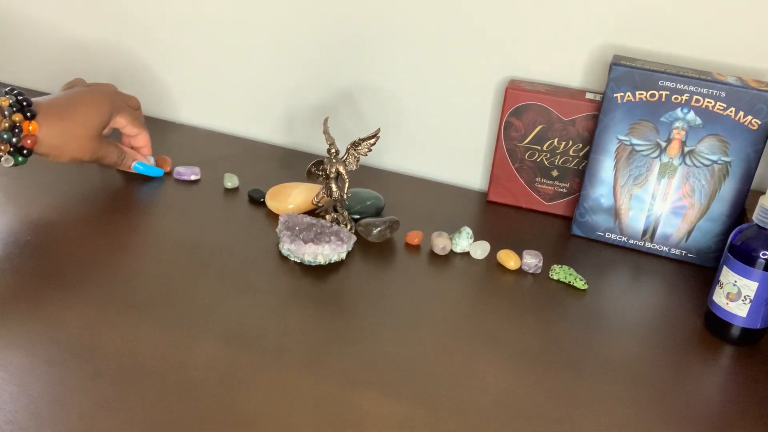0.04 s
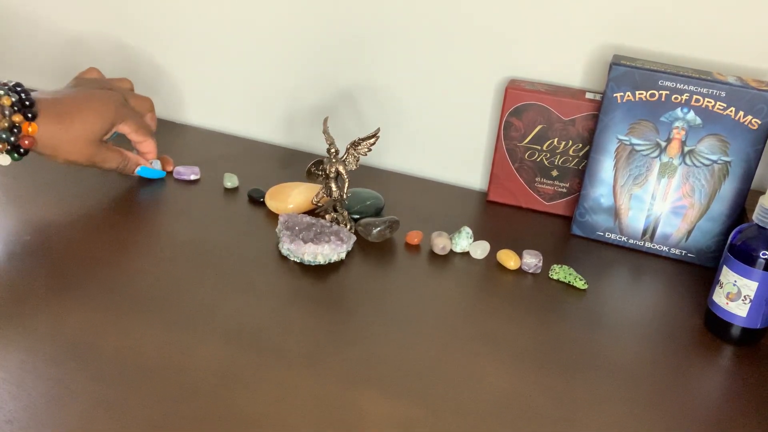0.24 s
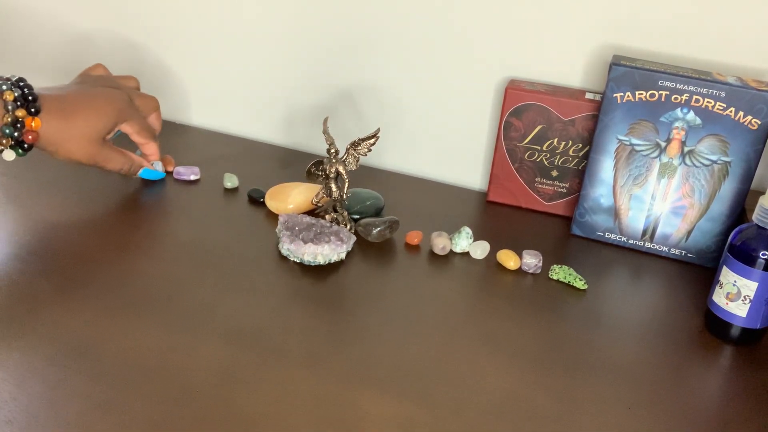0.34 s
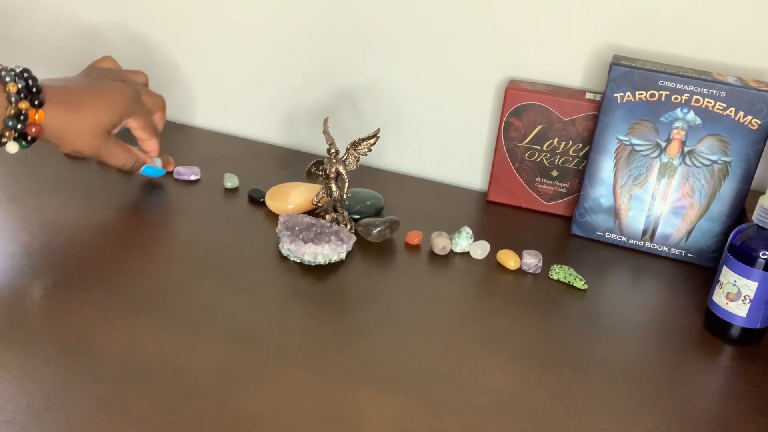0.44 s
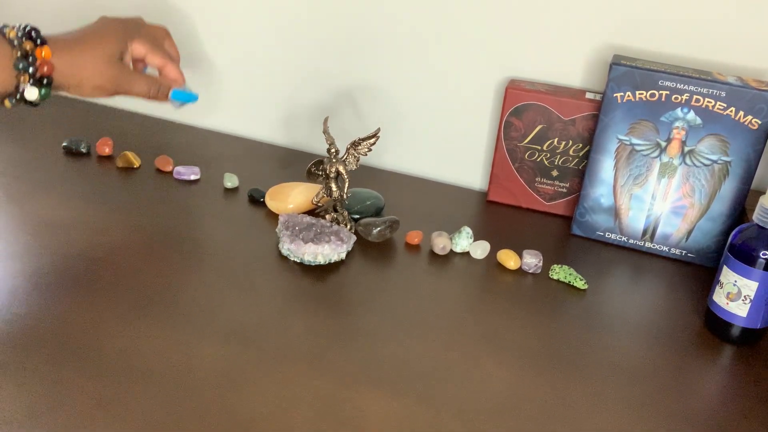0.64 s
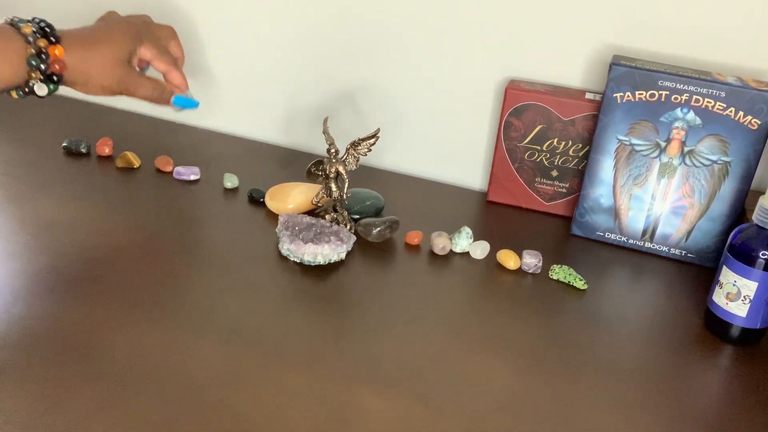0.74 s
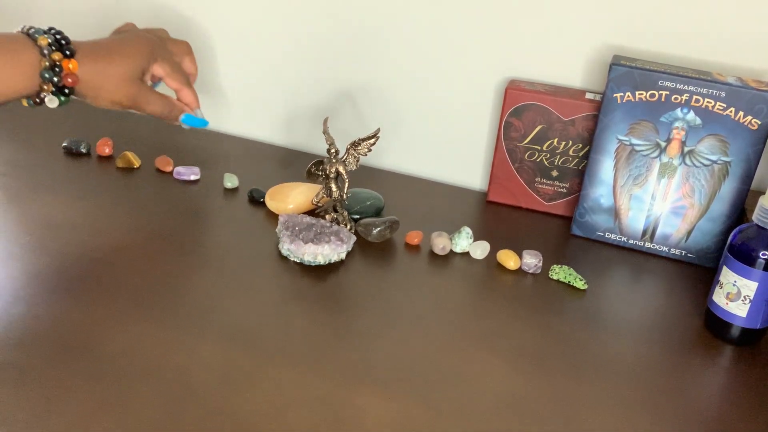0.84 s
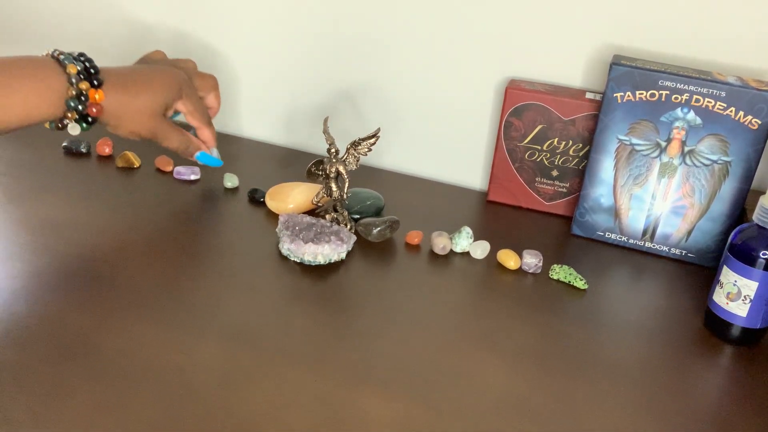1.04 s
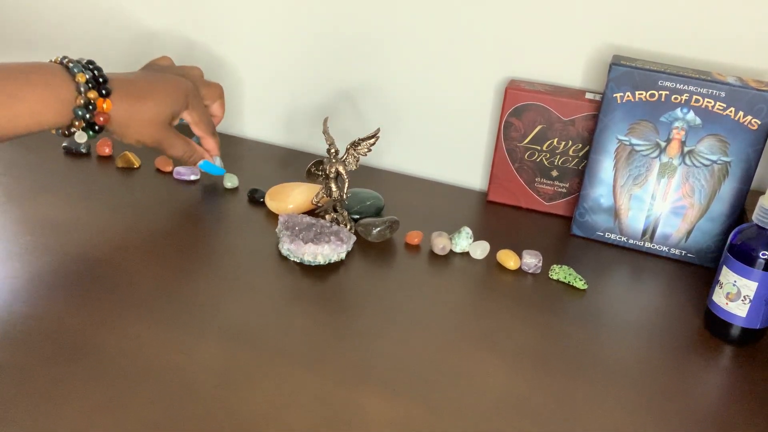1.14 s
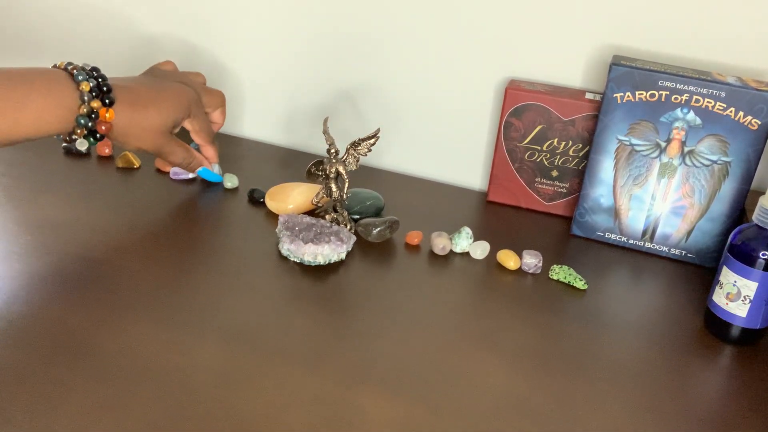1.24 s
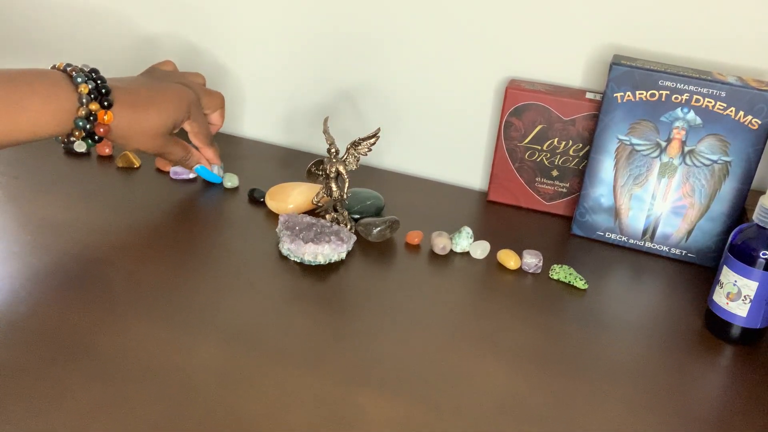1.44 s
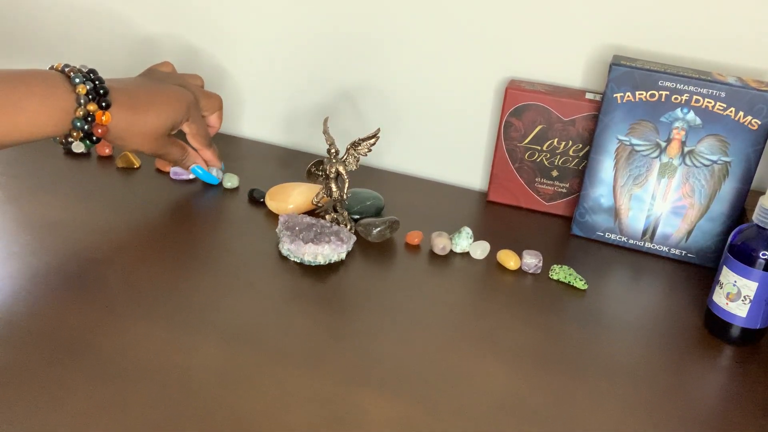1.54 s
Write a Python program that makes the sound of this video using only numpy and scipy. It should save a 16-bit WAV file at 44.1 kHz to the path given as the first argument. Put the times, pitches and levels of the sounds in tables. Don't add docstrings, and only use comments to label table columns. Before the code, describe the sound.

Small polished stones click onto a wooden desk one after another in a quiet, rumbling room

```python
import sys
import numpy as np
from scipy import signal
from scipy.fft import rfft, irfft
from scipy.io import wavfile
from scipy.ndimage import uniform_filter1d, map_coordinates

SR = 44100
rng = np.random.default_rng(int(sys.argv[2]) if len(sys.argv) > 2 else 0)


def gain_from_db(level_db):
    decades = np.asarray(level_db, float) / 20
    return 10 ** decades


def waveform_to_disk(signal):
    frames = np.transpose(np.atleast_2d(signal))
    scaled = np.clip(frames, -1, 1) * 32767
    samples = np.round(scaled).astype(np.int16)
    wavfile.write(sys.argv[1], SR, samples)


N = 70560
PAD = 8820


def evened(x):
    return x / np.sqrt(np.mean(x ** 2) + 1e-20)


def read(points, hz):
    f, value = np.transpose(points)
    return np.interp(np.log(hz + 1), np.log(f + 1), value)


def add(mix, s, sound):
    part = mix[PAD + round(s * SR):][:len(sound)]
    part += sound[:len(part)]


def shaped(x, gain):
    return irfft(rfft(x) * gain, len(x))


def band_passed(x, centre_hz, half_width, lowest_hz):
    edges = np.clip([centre_hz * (1 - half_width), centre_hz * (1 + half_width)], lowest_hz, 20000)
    return signal.lfilter(*signal.butter(2, edges, "bandpass", fs=SR), x)


def touches(rows, modes, loose=1):
    detune, spread_db, rise_cycles = .025, 1.5, .45
    crack_db, crack_t60_s = -14, 0.0047
    out, t = np.zeros(N + PAD), np.arange(16000) / SR
    hz, db, t60 = np.transpose(modes)[:, :, None]
    for s, strength_db, hard_hz in rows:
        pitch_draw, level_draw = rng.standard_normal((2, len(hz), 1))
        f = hz * (1 + loose * detune * pitch_draw)
        rise = (1 - np.exp(-t * f / rise_cycles)) ** 2
        decay = gain_from_db(db + spread_db * level_draw - 60 * t / t60)
        ring = (rise * decay * np.sin(2 * np.pi * f * t)).sum(0)
        crack = np.diff(rng.standard_normal(len(t) + 1)) * gain_from_db(crack_db - 60 * t / crack_t60_s)
        soft = signal.butter(4, min(hard_hz, 20000), fs=SR, output="sos")
        sound = signal.sosfilt(soft, ring + crack)
        add(out, s, gain_from_db(strength_db) * sound / abs(sound).max())
    return out


# start in seconds, strength in dB, contact hardness in Hz.
FIRST_TOUCHES = [
    (.2209, 0.5, 8100),
    (.2239, -2.5, 8000),
    (.2261, -9.5, 7040),
    (.227, 1.5, 12000),
    (.2288, 3, 7157),
    (.2311, 2, 5743),
    (.2327, -15, 3000),
    (.234, -13, 4500),
    (.2364, -10, 2996),
    (.2383, -18, 2975),
]
# frequency in Hz, level in dB, decay time t60 in seconds.
FIRST_MODES = [(1340, -21.5, 0.023), (1543, -11, 0.036), (1903, -18.5, 0.016), (2068, 6, 0.01),
               (2423, 2, 0.0099), (2687, -0.5, 0.0081), (3070, -12, 0.011), (3335, -14.5, 0.011),
               (3950, -27.5, 0.0039), (4896, -5, 0.0081), (5136, -10, 0.0067), (6850, -27.5, 0.005),
               (7880, -22.5, 0.024), (11000, -32, 0.0046)]


def first_stone():
    return touches(FIRST_TOUCHES, FIRST_MODES, loose=0.17)


# start in seconds, strength in dB, contact hardness in Hz.
SECOND_TOUCHES = [(1.1927, -7.5, 8200), (1.1952, -54, 6150), (1.197, -17.5, 4200), (1.199, -20.5, 5500),
                  (1.2012, -14.5, 6200), (1.2045, -56, 4040), (1.2062, -21, 5070), (1.2086, -15, 6100),
                  (1.2153, -17, 5560), (1.2185, -22.5, 3500), (1.2205, -19.5, 5130), (1.2248, -31, 5190),
                  (1.2266, -32, 4020), (1.23, -32, 4500), (.638, -55, 2430), (.646, -47, 2000),
                  (.72, -53.5, 2470), (.892, -55, 4000), (.932, -57, 2350), (.98, -55.5, 4960),
                  (1.105, -64, 4000), (1.13, -64, 3500)]
# frequency in Hz, level in dB, decay time t60 in seconds.
SECOND_MODES = [(1200, -18, 0.0068), (1670, -3, 0.0045), (1980, -10.5, 0.012), (2298, -4, 0.013),
                (2606, -2, 0.007), (3400, -1.5, 0.0056), (4000, -21.5, 0.011), (4870, -12, 0.01),
                (5500, -8.5, 0.0053), (6700, -20, 0.00546), (7200, -33, 0.0035), (8620, -21, 0.015),
                (9050, -25, 0.01), (11300, -29, .004)]


def second_stone():
    return touches(SECOND_TOUCHES, SECOND_MODES)


# start in seconds, strength in dB, contact hardness in Hz.
TAPPED_TOUCHES = [
    (.098, -41.5, 2890),
    (.1098, -19.5, 13960),
    (.1111, -24, 9100),
    (.1125, -27.5, 4000),
    (.1169, -22, 8000),
    (.1207, -28, 10100),
    (.124, -37, 8000),
    (.1315, -34, 6050),
    (.142, -32.5, 4000),
]
# frequency in Hz, level in dB, decay time t60 in seconds.
TAPPED_MODES = [(750, -18.5, 0.015), (1220, -13.5, 0.011), (2000, -4.5, 0.0085), (2290, -3.5, .008),
                (2600, -7, 0.0065), (3060, -4, 0.006), (4200, -10, 0.0013), (5400, -6, 0.0042),
                (6500, -10.5, .004), (8866, -7, 0.0059), (10000, -19, 0.0013)]


def tapped_stone():
    return touches(TAPPED_TOUCHES, TAPPED_MODES)


# start in seconds, strength in dB, contact hardness in Hz.
PADDED_TOUCHES = [
    (.4795, -32, 5500),
    (.483, -42, 2650),
    (.487, -34, 2530),
    (.4925, -28.5, 4500),
    (.495, -46, 2420),
    (.499, -41.5, 2590),
    (.503, -58, 1980),
    (1.5805, -45.5, 3400),
    (1.587, -53, 1990),
]
# frequency in Hz, level in dB, decay time t60 in seconds.
PADDED_MODES = [(762, -16, 0.17), (876, -4, 0.031), (1160, -5, 0.021), (1868, -1.5, 0.048),
                (1867, -2, 0.031), (2307, 4.5, 0.01191), (2840, 9.5, 0.0036), (3500, -4, 0.0046),
                (4500, -7, 0.0039), (8300, -3, 0.0054)]


def padded_stone():
    return touches(PADDED_TOUCHES, PADDED_MODES)


# start in seconds, strength in dB, contact hardness in Hz.
NUDGED_TOUCHES = [
    (-.09, -23, 3000),
    (.7985, -54, 2450),
    (.802, -60.5, 2000),
    (1.4808, -30.5, 4000),
    (1.4838, -32, 3400),
    (1.488, -37.5, 2300),
    (1.495, -64, 2280),
]
# frequency in Hz, level in dB, decay time t60 in seconds.
NUDGED_MODES = [(471.7, -18.5, 0.11), (1040.4, -15, 0.02), (1262, 1, 0.018), (1590, -3, 0.031),
                (1670, -7.5, 0.014), (2000, -3.5, 0.018), (2270, -15.5, 0.014), (2980, -14, 0.015),
                (3300, -11, 0.007)]


def nudged_stone():
    return touches(NUDGED_TOUCHES, NUDGED_MODES)


# start in seconds, strength in dB, contact hardness in Hz.
DESK_BLOWS = [
    (.111, -35.5, 2020),
    (.2215, -14.5, 2600),
    (.2275, -19, 2610),
    (.481, -42, 1500),
]
# frequency in Hz, level in dB, decay time t60 in seconds.
DESK_MODES = [(216, -14.5, 0.11), (358.6, -3, 0.06), (400, 2, 0.073), (479, -4, 0.072), (679, -1, 0.037),
              (732, -4.5, 0.1), (974, -5.5, 0.034), (1153, -20.5, 0.018), (1348, 5.5, 0.023),
              (1556, -8.5, 0.05)]


def near_desk():
    return touches(DESK_BLOWS, DESK_MODES, loose=0)


# start in seconds, strength in dB, contact hardness in Hz.
FAR_BLOWS = [
    (1.193, -21.5, 2300),
    (1.209, -24, 2030),
    (1.482, -39.5, 1500),
    (1.581, -43.5, 1500),
]
# frequency in Hz, level in dB, decay time t60 in seconds.
FAR_DESK_MODES = [(240, -7, 0.13), (335, 3, 0.033), (413, 5.5, 0.033), (468, -9, 0.074), (739, -8.5, 0.14),
                  (746, -8, 0.096), (1011, -4, 0.035), (1174, 0, 0.071), (1278, 3, 0.051), (1750, 6, 0.044)]


def far_desk():
    return touches(FAR_BLOWS, FAR_DESK_MODES, loose=0)


# start in seconds, strength in dB, pitch in Hz.
BEAD_TICKS = [(0.178, -51, 10700), (0.198, -45, 8160), (.405, -50, 11000), (.5425, -76.5, 7340),
              (.557, -37.5, 9280), (0.607, -58.5, 6500), (.638, -54, 9100), (0.665, -57, 8800),
              (.731, -58, 10770), (0.798, -56, 8000), (.865, -53.5, 9000), (0.893, -58, 8760),
              (0.961, -53, 8350), (0.979, -57, 8600), (1.079, -58, 8300), (1.104, -60, 6140),
              (1.379, -45.5, 9550), (1.377, -47, 4000)]


def beads():
    t60_s = .009
    out, t = np.zeros(N + PAD), np.arange(1000) / SR
    for s, strength_db, hz in BEAD_TICKS:
        burst = rng.standard_normal(len(t)) * gain_from_db(-60 * t / t60_s)
        tick = band_passed(burst, hz, .4, 100)
        add(out, s, gain_from_db(strength_db) * tick / abs(tick).max())
    return out


# start in seconds, length in seconds, level in dB, centre in Hz.
RUB_STROKES = [(-.03, .12, -68, 2211), (0.001, .06, -72.5, 8800), (0.076, 0.043, -54, 1794),
               (0.094, 0.0093, -83, 5500), (0.107, 0.035, -41, 1990), (0.118, 0.094, -75, 7680),
               (0.511, 0.056, -61, 1545), (0.604, 0.16, -77.5, 8930), (0.592, 0.39, -72, 1430),
               (0.749, 0.19, -71, 1203), (0.847, 0.099, -79, 3500), (1.156, 0.013, -74, 1430),
               (1.486, 0.062, -59.5, 1400), (1.493, 0.095, -78, 3500), (1.579, 0.061, -46, 900)]


def rubs():
    grit_db = 3
    out = np.zeros(N + PAD)
    for s, length, db, hz in RUB_STROKES:
        hiss, rough = rng.standard_normal((2, 8000))[:, :round(length * SR)]
        grit = gain_from_db(db + grit_db * evened(uniform_filter1d(rough, size=80)))
        stroke = np.hanning(len(hiss)) ** .5
        add(out, s, evened(band_passed(hiss, hz, .45, 50)) * grit * stroke)
    return out


# start in seconds, level in dB, frequency in Hz, swell in seconds.
LOW_BOOMS = [
    (.222, -36, 139.5, 0.02),
    (1.193, -40, 134.7, 0.007),
    (1.583, -37.5, 190, .01),
]


def booms():
    t60_s = 0.55
    out, t = np.zeros(N + PAD), np.arange(16000) / SR
    for s, db, hz, swell in LOW_BOOMS:
        envelope = gain_from_db(db - 60 * t / t60_s) * (1 - np.exp(-t / swell)) ** 2
        add(out, s, envelope * np.sin(2 * np.pi * hz * t))
    return out


def scattered(x):
    path = .2 * np.cumsum(evened(uniform_filter1d(rng.standard_normal(len(x)), size=40)))
    drift = path - uniform_filter1d(path, size=800)
    return map_coordinates(x, [np.arange(len(x)) + drift], order=3, mode="nearest")


# low edge in Hz, high edge in Hz, level in dB.
THROWS = [
    (1400, 8000, -1),
    (700, 25000, -2.5),
    (600, 7000, -3.5),
    (610, 2800, -0.5),
    (1500, 9100, -0.5),
]


def thrown(stones):
    away = []
    for x, (low_hz, high_hz, db) in zip(stones, THROWS):
        band = signal.butter(1, [low_hz, min(high_hz, 20000)], "bandpass", fs=SR)
        away.append(gain_from_db(db) * signal.lfilter(*band, scattered(x)))
    return away


EARLY_SHARES = [
    -13.5,
    -9.5,
    -9,
    -7,
    -5,
    0.5,
]


def nearby(sources):
    t60_s, rise_s = 0.16, 0.00082
    t = np.arange(6000) / SR
    early = []
    for x, db in zip(sources, EARLY_SHARES):
        spray = rng.standard_normal(len(t)) * gain_from_db(-60 * t / t60_s) * np.minimum(t / rise_s, 1)
        early.append(gain_from_db(db) * signal.fftconvolve(x, spray / np.linalg.norm(spray))[:len(x)])
    return early


# frequency in Hz, decay time t60 in seconds.
ROOM_DECAY = [(120, 0.79), (320, 0.62), (840, 0.71), (2210, 0.42), (5000, 0.54), (8000, 0.39), (11000, 0.6),
              (14000, .2)]
# frequency in Hz, level in dB.
WALL_COLOUR = [(150, -12.5), (400, 0.5), (700, 0.5), (1500, -0.5), (3000, -4), (5300, -10), (6500, -12.5),
               (12000, 3)]


def room(x):
    delay_s = .003
    taps = np.zeros(SR)
    at = np.arange(0, SR - 20, 10)
    taps[at + rng.integers(0, 10, len(at))] = rng.choice([-1., 1.], len(at))
    taps[:round(delay_s * SR)] = 0
    hz, t, z = signal.stft(taps, SR, nperseg=256)
    colour_db = read(WALL_COLOUR, hz)[:, None]
    decay_db = 60 * t / read(ROOM_DECAY, hz)[:, None]
    tail = signal.istft(z * gain_from_db(colour_db - decay_db), SR, nperseg=256)[1]
    return signal.fftconvolve(x, tail / np.linalg.norm(tail))[:len(x)]


# frequency in Hz, level in dB per Hz.
AIR_SPECTRUM = [(15, -1), (65, -21), (150, -33), (350, -31), (700, -41), (2000, -56.5), (9000, -63),
                (16000, -70.5)]
# frequency in Hz, width in Hz, level in dB.
ROOM_HUMS = [
    (47.4, 9.2, -51),
    (122.3, 3.4, -61.5),
    (150.5, 5.9, -66),
]


def air():
    hz = np.fft.rfftfreq(N, 1 / SR)
    out = gain_from_db(-42.5) * evened(shaped(rng.standard_normal(N), gain_from_db(read(AIR_SPECTRUM, hz))))
    for f, width, db in ROOM_HUMS:
        bell = np.exp(-((hz - f) / width) ** 2)
        out += gain_from_db(db) * evened(shaped(rng.standard_normal(N), bell))
    return out


def scene():
    room_db, wood_room_db, far_room_db, bead_room_db = -10, -7, -2, -15
    stones = [first_stone(), second_stone(), padded_stone(), nudged_stone(), tapped_stone()]
    far = far_desk()
    desk = near_desk() + far
    away = thrown(stones)
    *stones_early, desk_early = nearby(away + [desk])
    near = sum(stones_early)
    wood = desk + desk_early + rubs()
    ticks = beads()
    wood_away = gain_from_db(wood_room_db) * scattered(wood) + gain_from_db(far_room_db) * scattered(far)
    sent = gain_from_db(room_db) * (sum(away) + near + wood_away) + gain_from_db(bead_room_db) * ticks
    heard = sum(stones) + near + wood + booms() + ticks + room(sent)
    mic = signal.butter(2, 11400, fs=SR)
    return (signal.lfilter(*mic, heard)[PAD:] + air())[None]


def roll_off(x):
    return signal.sosfilt(signal.butter(12, 16350, fs=SR, output="sos"), x)


def record(dry):
    ceiling, edge_hz = 1, 16200
    knee = dry / (1 + (abs(dry) / ceiling) ** 6) ** (1 / 6)
    mix = signal.oaconvolve(knee, signal.firwin(255, edge_hz, fs=SR)[None], "same")
    return roll_off(mix)


dry = scene()
out = record(dry)
waveform_to_disk(out)
```